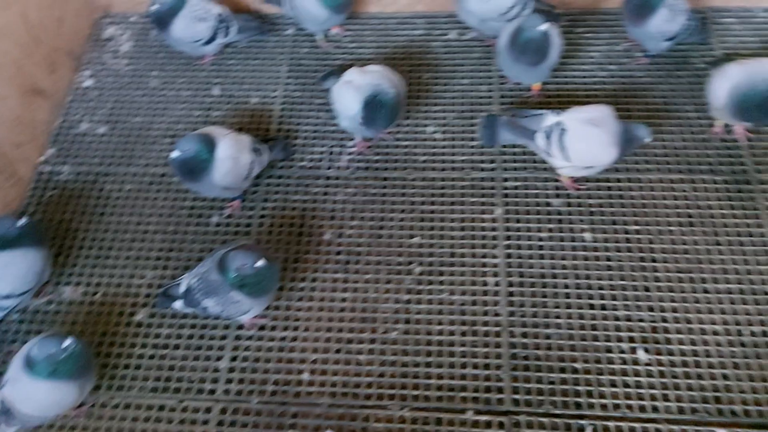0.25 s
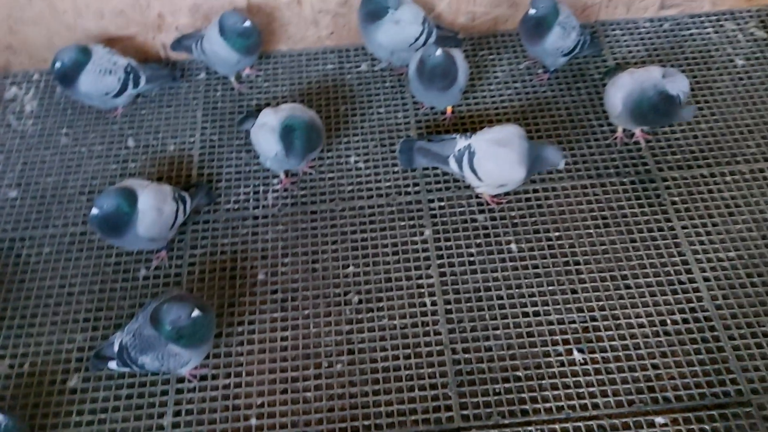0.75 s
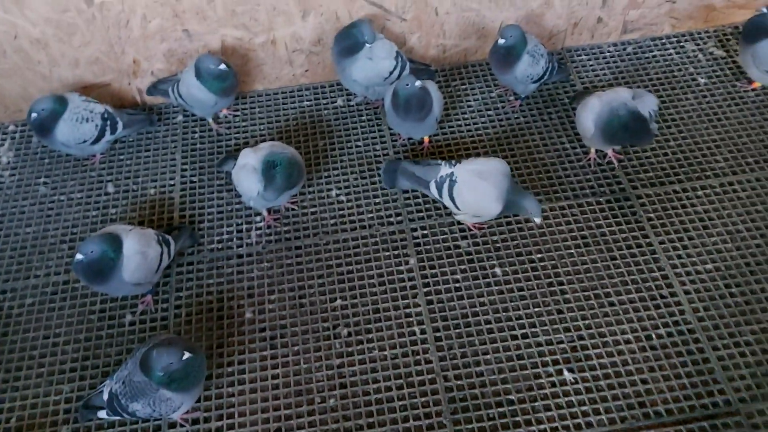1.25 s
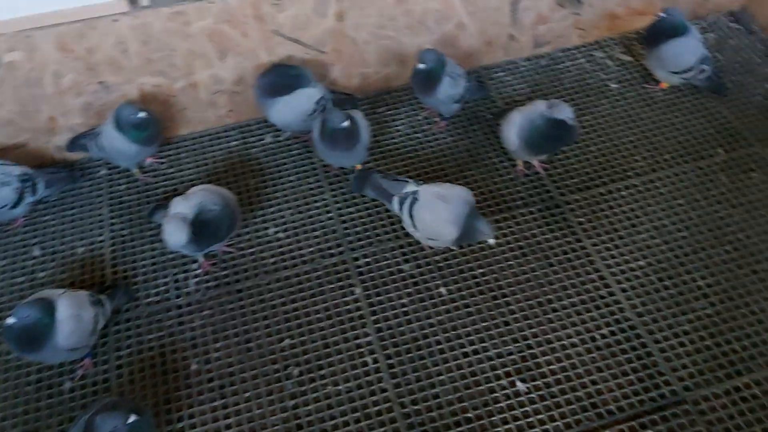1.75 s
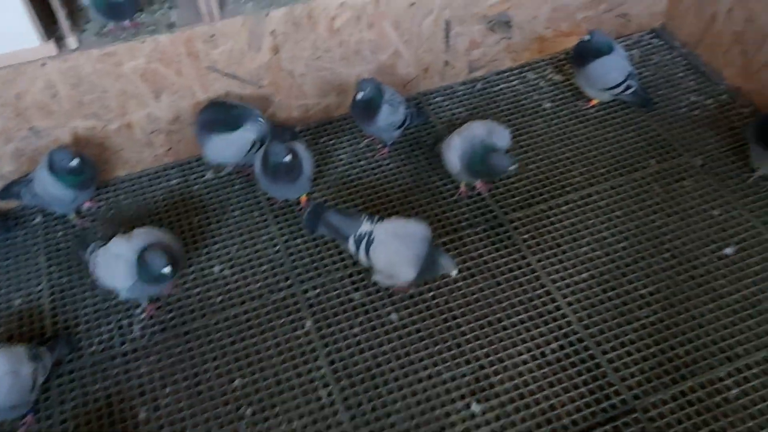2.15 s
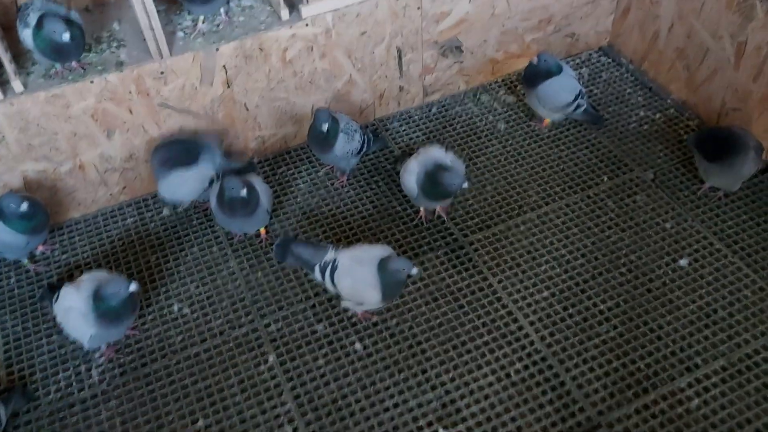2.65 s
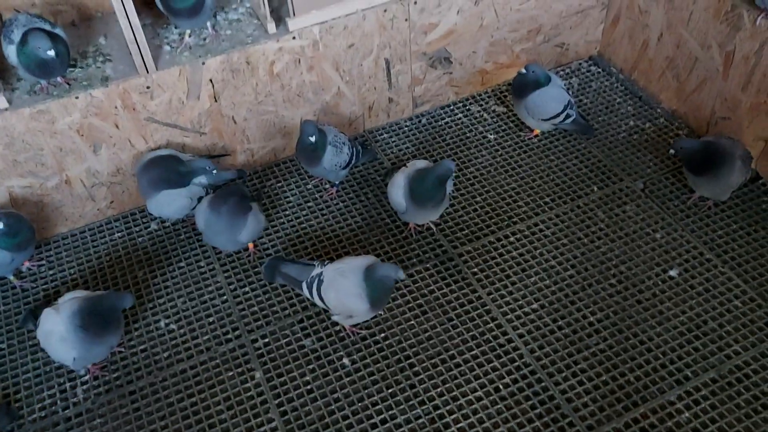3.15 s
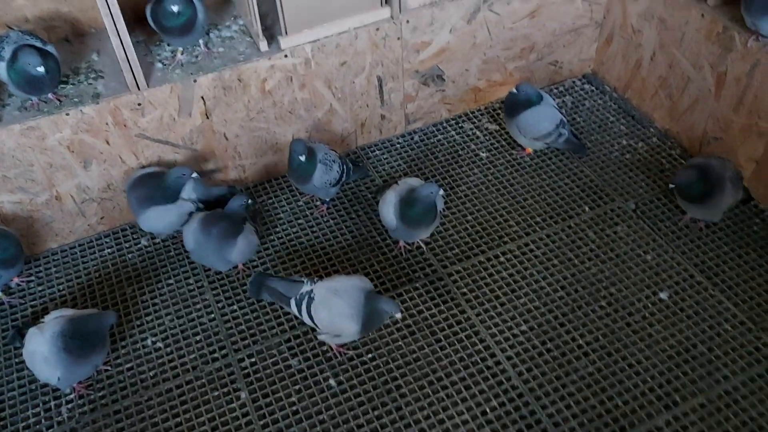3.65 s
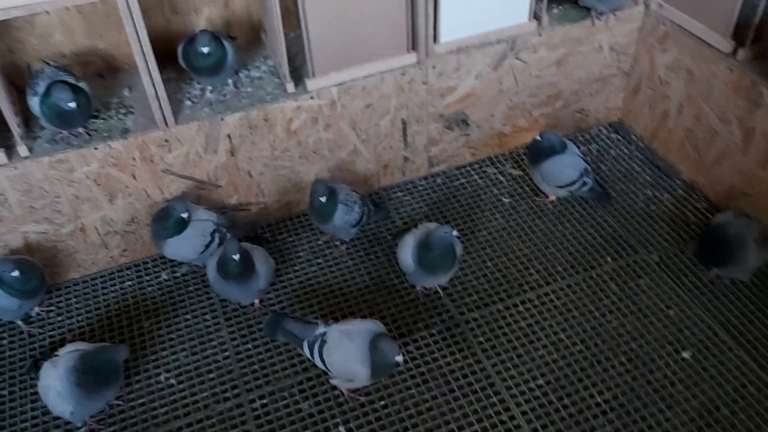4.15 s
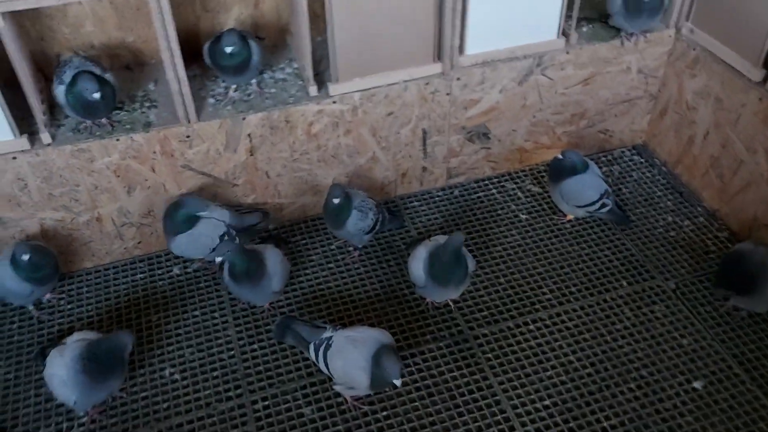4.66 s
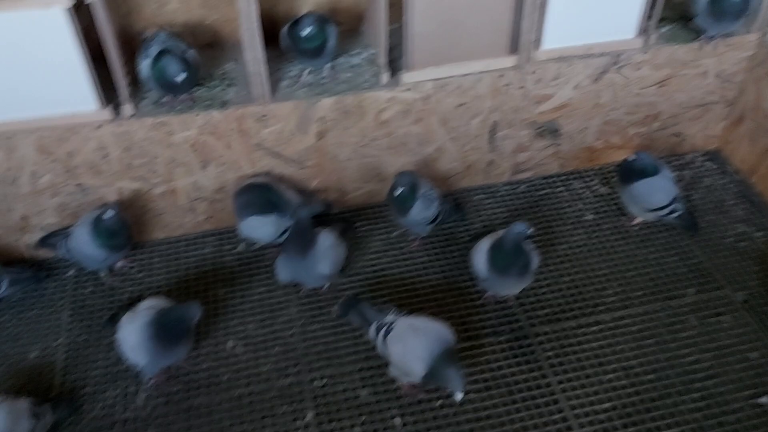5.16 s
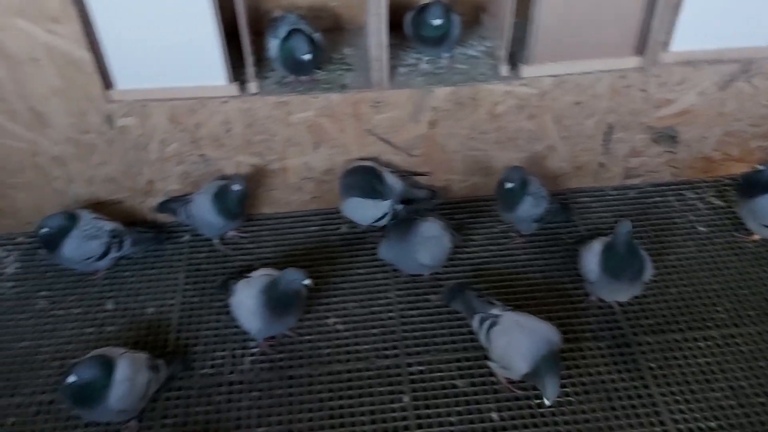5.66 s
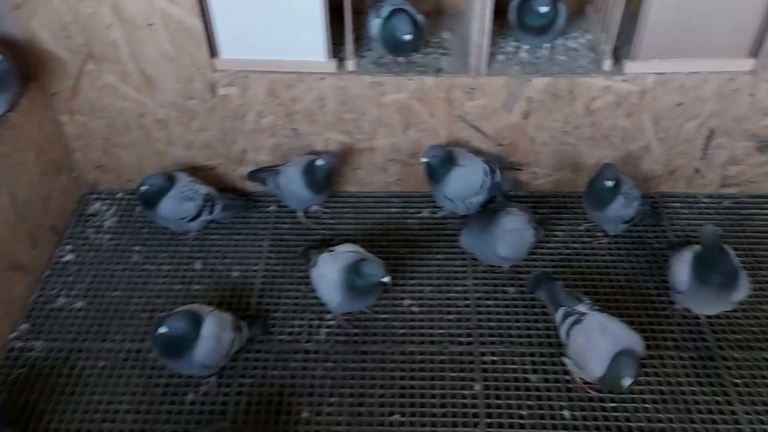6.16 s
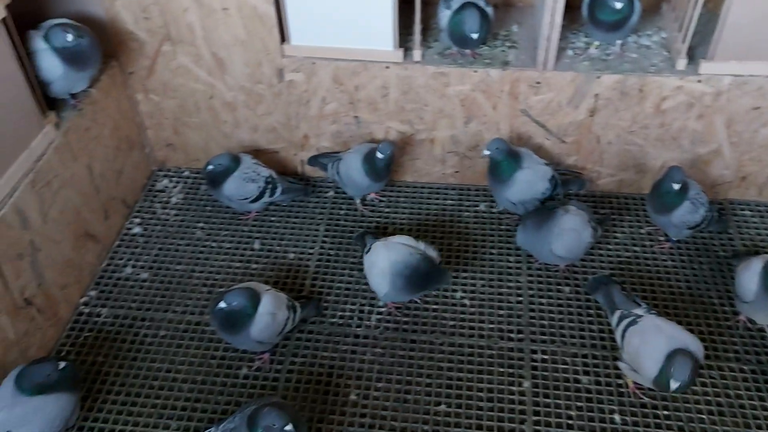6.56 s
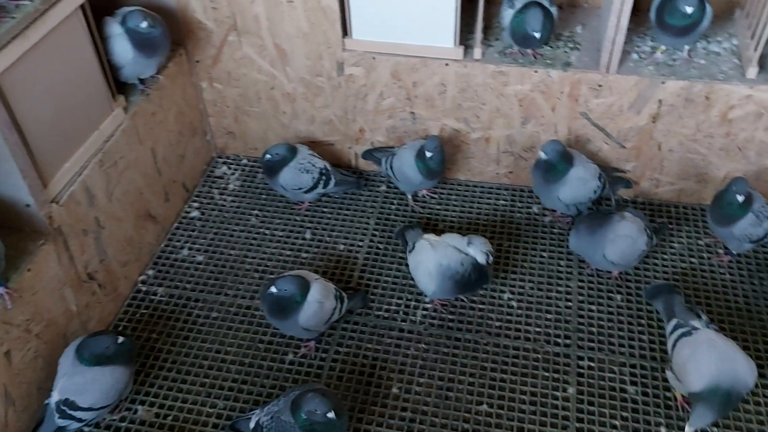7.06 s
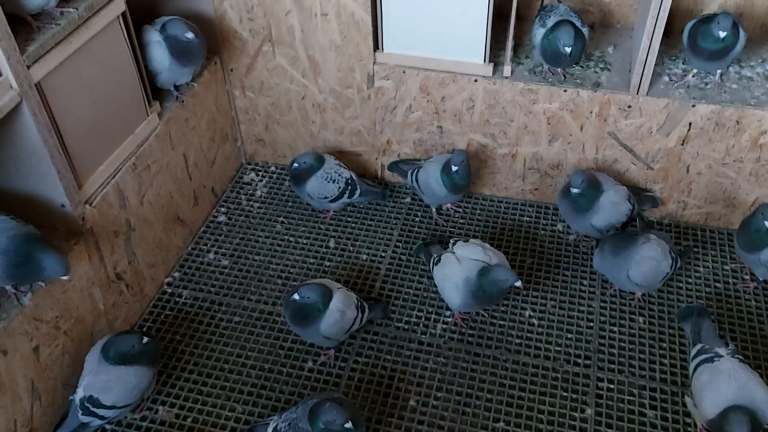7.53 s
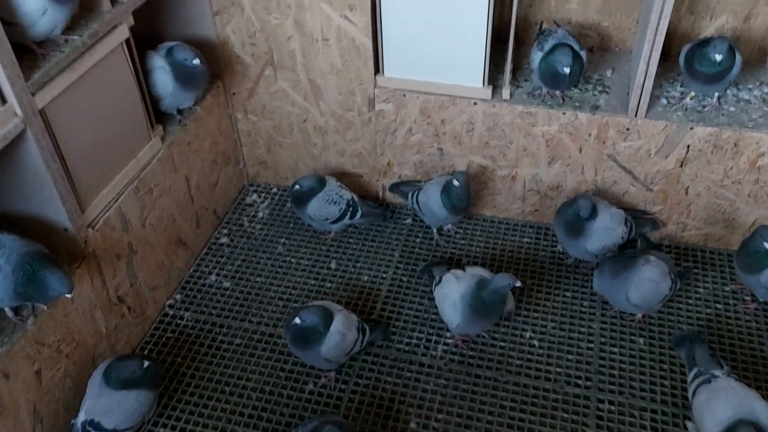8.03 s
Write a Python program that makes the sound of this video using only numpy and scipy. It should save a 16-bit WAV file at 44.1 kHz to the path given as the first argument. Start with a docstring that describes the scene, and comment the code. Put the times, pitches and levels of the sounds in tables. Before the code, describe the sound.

Many pigeons coo in a small wooden loft, close to a handheld stereo microphone. Low, nearly pure notes break into quick throaty trills or glide, some turning hoarse, over a murmur of birds farther back. Claws tick on the floor grating, feathers and a sleeve rustle faintly. The cooing thins after six seconds, wings flap dully at seven, then the voices return.

```python
"""In a small wooden loft, racing pigeons coo over one another close to a hand-held camera with two microphones.
Each near coo is a low, nearly pure note, chopped into a throaty trill or drawn out in a glide, and some turn
hoarse; wavering tones blend into the murmur of birds farther back, and reflections off the boards surround them.
Bursts of shaped noise make claws ticking on the grating, rustling feathers and sleeve, and beating wings,
over a low rumble, two unsteady hums and a faint wash of air."""
import sys
import numpy as np
from scipy import signal
from scipy.fft import rfft, irfft
from scipy.io import wavfile

SR = 44100
rng = np.random.default_rng(int(sys.argv[2]) if len(sys.argv) > 2 else 0)


def store_pcm(level_fs):
    """Save levels as 16-bit WAV."""
    pcm = np.round(np.clip(level_fs, -1, 1) * 32767).astype(np.int16)
    wavfile.write(sys.argv[1], SR, np.atleast_2d(pcm).T)


N = 365588
TIME = np.arange(N) / SR
# Levels in the tables are those before the gains and room balance applied further on.


def amp(db):
    """Decibels to gain."""
    return 10 ** (np.asarray(db) / 20)


def unit(x):
    """Scales to rms 1."""
    return x / np.sqrt(np.mean(x ** 2) + 1e-20)


def read(points, hz):
    """Reads a spectrum table on a log-frequency axis."""
    f, value = np.transpose(points)
    return np.interp(np.log(hz + 1), np.log(f + 1), value)


def level(curve):
    """A (time [s], level [dB]) curve as a gain for every sample."""
    return amp(np.interp(TIME, *np.transpose(curve)))


def swells(rows):
    """Rows of (middle [s], level [dB], time from middle to 1/e [s]) as smooth bumps of gain."""
    return sum(amp(db) * np.exp(-((TIME - s) / length) ** 2) for s, db, length in rows)


def colour(x, points):
    """Filters by a spectrum table, falling away steeply beyond its ends."""
    hz = np.fft.rfftfreq(x.shape[-1], 1 / SR) + 1
    low_skirt = 1 + (0.7 * points[0][0] / hz) ** 8
    high_skirt = 1 + (0.7 * hz / points[-1][0]) ** 8
    gain = amp(read(points, hz)) / np.sqrt(low_skirt * high_skirt)
    return irfft(rfft(x) * gain, x.shape[-1])


def wander(hz, size):
    """Smooth chance of rms 1, its spectrum a Gaussian fall of width hz."""
    spectrum = rfft(rng.standard_normal(size))
    fall = np.exp(-0.5 * (np.fft.rfftfreq(size, 1 / SR) / hz) ** 2)
    return unit(irfft(spectrum * fall, size))


def resonate(x, hz, width):
    """A two-pole resonance of peak gain 1."""
    return signal.lfilter(*signal.iirpeak(hz, hz / width, SR), x)


def add(mix, s, sound):
    """Mixes a sound in at a time."""
    part = mix[max(round(s * SR), 0):][:len(sound)]
    part += sound[:len(part)]


def beat(hz, length, arch, jitter, size=8192):
    """One puff through the syrinx, centred in its buffer: the pitch rises and falls with the pressure."""
    t = (np.arange(size) - size // 2) / SR
    swell = np.cos(np.pi / 2 * np.clip(t / length, -1, 1)) ** 2  # length is half of the puff
    pitch = hz * (1 + arch * (swell - 0.8) + jitter * wander(62, size=size))
    turns = np.cumsum(pitch) / SR
    lead = -t[0]  # from the start of the buffer to the middle of the puff
    return lead, swell, 2 * np.pi * (turns - turns[size // 2])


RASP_HZ, RASP_SPREAD = 446.7, 0.045  # throat resonance [Hz], its random shift between beats [share]
# The throat opens with effort: rise of the resonance [share per dB] over a beat of usual level [dB].
RASP_RISE, USUAL_DB = 0.0052, -36


def trill_beat(db, hz, length, rasp_db):
    """One beat of a near-pure note; an uneven flutter of the membranes adds a rasp that rings in the throat."""
    lead, swell, phase = beat(hz, length, arch=0.12, jitter=0.052)
    note = np.sin(phase) + amp(-39.0) * np.sin(2 * phase) + amp(-45) * np.sin(3 * phase)
    # Strong and weak cycles alternate: a faint growl an octave down.
    note = np.sqrt(2) * note + amp(-24.5) * np.sin(phase / 2)
    flutter = np.sin(phase) * wander(170, size=len(phase))
    shift = RASP_RISE * (db - USUAL_DB) + RASP_SPREAD * rng.standard_normal()
    rasp_hz = RASP_HZ * np.exp(shift)
    rasp = signal.hilbert(resonate(resonate(flutter, rasp_hz, 120), rasp_hz, 120))
    rasp_power = np.average(abs(rasp) ** 2, weights=swell) / 2
    rasp = rasp.real / np.sqrt(rasp_power)
    return lead, amp(db) * (swell * note + amp(rasp_db) * np.sqrt(swell) * rasp)


# Trills of birds close to the microphones: (first beat [s], last beat [s], number of beats,
# first level [dB], last level [dB], first pitch [Hz], last pitch [Hz], rasp over the note [dB])
TRILLS = [(0.515, 0.546, 2, -40.5, -44, 304, 313, -8.5), (0.616, 0.649, 2, -37.5, -45, 363, 333, -4),
          (0.686, 0.711, 2, -38, -41, 297, 325, -12), (0.819, 0.847, 2, -41, -37.5, 301, 290, -13),
          (1.064, 1.212, 4, -36.5, -31.5, 291, 298, -6.5), (1.702, 1.785, 3, -36, -37.5, 346, 296, -10.5),
          (2.062, 2.1, 2, -38.5, -34, 374, 301, -13), (2.138, 2.215, 3, -38, -27.5, 297, 315, -9.5),
          (2.339, 2.393, 2, -40.5, -47, 307, 290, -21), (2.435, 2.484, 2, -40, -41, 279, 282, -12.5),
          (2.55, 2.597, 2, -40.5, -39, 296, 299, -14.5), (2.798, 2.975, 3, -34, -35.5, 341, 289, -17),
          (3.067, 3.2, 3, -38.5, -40.5, 315, 269, -5), (3.257, 3.307, 2, -32, -32, 304, 353, -1.5),
          (3.344, 3.366, 2, -31, -26.5, 376, 329, -5.5), (3.51, 3.542, 2, -37, -39.5, 274, 298, -8),
          (3.945, 3.987, 2, -31.5, -38.5, 298, 316, -17), (4.126, 4.173, 3, -42.5, -37, 290.6, 271, -7.5),
          (4.241, 4.347, 3, -35, -57, 388, 296, -14.5), (4.369, 4.416, 2, -33.5, -29.5, 295, 322, -8),
          (4.459, 4.516, 3, -31.5, -32.5, 328, 285, -3), (4.632, 4.657, 2, -59, -38.5, 290, 275, -6),
          (4.828, 4.87, 2, -42, -43.5, 235, 273, -6.5), (5.143, 5.248, 3, -43.5, -40.5, 284, 267, -11.5),
          (5.284, 5.422, 3, -37.5, -48, 356, 262, -14.5), (5.65, 5.735, 3, -35.5, -28, 305, 297, -12),
          (5.79, 5.852, 2, -31, -41, 299, 282, -10), (5.924, 6.007, 3, -37, -35.5, 298, 275, -12),
          (6.051, 6.098, 2, -44.5, -41.5, 310, 240, -10), (6.92, 6.942, 2, -45, -47, 270, 283, -13),
          (7.302, 7.462, 5, -41, -41.5, 292, 318, -18), (7.68, 7.73, 2, -38.5, -32.5, 309, 247, -8.5),
          (7.779, 7.8, 2, -27.5, -27.5, 381, 341, -19.5), (7.848, 7.874, 2, -34, -35.5, 258, 258, -9),
          (8.02, 8.043, 2, -36, -59, 237, 225, -15.5)]
BEAT_S, BEAT_FILL = 0.025, 0.6  # longest half length of a beat [s], its largest share of the spacing
TRILL_SWELL_DB, BEAT_SCATTER_DB = -1.5, 0.5  # change of level at mid-trill, random spread between beats


def trills():
    """Runs of evenly spaced beats; strength and pitch slide from the first beat to the last."""
    out = np.zeros(N)
    for first, last, beats, first_db, last_db, first_hz, last_hz, rasp_db in TRILLS:
        along = np.linspace(0, 1, max(round(beats), 2))
        length = min(BEAT_S, BEAT_FILL * (last - first) * along[1])
        for u in along:
            db = first_db + (last_db - first_db) * u + TRILL_SWELL_DB * np.sin(np.pi * u)
            db += BEAT_SCATTER_DB * rng.standard_normal()
            hz = first_hz + (last_hz - first_hz) * u
            lead, sound = trill_beat(db, hz, length, rasp_db)
            add(out, first + (last - first) * u - lead, sound)
    return out


SCOOP, SCOOP_S = 0.1, 0.022  # a coo starts sharp by this share and settles with this time constant [s]
DROOP, DROOP_S = 0.08, 0.023  # it ends flat by this share, approached with this time constant [s]
COO_ATTACK_S, COO_RELEASE_S, COO_FADE_DB = 0.017, 0.018, -2.5  # swell in, stop, fade along its length
OCTAVE_ATTACK_S = 0.035  # the octave blooms later than the fundamental
# Pitch tremble [share] at the usual level; it doubles as the coo weakens by this much [dB].
TREMBLE, TREMBLE_DOUBLES_DB = 0.01, 7


def glide(length, early_hz, late_hz, low_db, octave_db, scoop):
    """A drawn-out note and its octave glide, droop as the air runs out, and tremble; scoop starts it sharp."""
    t = np.arange(0, length, 1 / SR)
    tremble = wander(33, size=32768)[:len(t)]
    shimmer = wander(51, size=32768)[:len(t)]
    bend = 1 + scoop * np.exp(-t / SCOOP_S) - DROOP * np.exp((t - length) / DROOP_S)
    hz = (early_hz + (late_hz - early_hz) * t / length) * bend
    weakness_db = USUAL_DB - max(low_db, octave_db)
    unsteady = min(TREMBLE * 2 ** (weakness_db / TREMBLE_DOUBLES_DB), 0.05)
    phase = 2 * np.pi * np.cumsum(hz * (1 + unsteady * tremble)) / SR
    edge = np.minimum(t / COO_ATTACK_S, (length - t) / COO_RELEASE_S)
    fade = np.sin(np.pi / 2 * np.clip(edge, 0, 1)) ** 2
    bloom = 1 - np.exp(-t / OCTAVE_ATTACK_S)
    note = amp(low_db) * np.sin(phase) + amp(octave_db) * bloom * np.sin(2 * phase)
    return np.sqrt(2) * note * fade * amp(COO_FADE_DB * t / length + 2.1 * shimmer)


# Drawn-out coos close by, before scoop and droop: (start [s], length [s], early pitch [Hz],
# late pitch [Hz], fundamental level [dB], octave level [dB])
COOS = [(1.32, .22, 183.3, 223.6, -47, -59), (1.9, 0.14, 301, 314.4, -41, -62),
        (2.238, 0.074, 305.6, 310.5, -25, -60), (2.375, .22, 204.7, 255.3, -45.5, -56),
        (2.85, 0.245, 175, 168.4, -51.5, -70), (3.535, 0.11, 240.7, 240.6, -39.5, -47),
        (3.675, 0.24, 359, 308.8, -26, -60), (4.22, 0.14, 222.4, 242, -47.5, -41),
        (4.655, 0.14, 240, 240.7, -44.5, -48), (5.13, 0.4, 168.2, 179.8, -51, -71),
        (5.35, 0.2, 271.7, 305.2, -38.5, -82), (5.485, 0.051, 236, 239, -44.5, -43),
        (5.62, 0.087, 218.7, 234.4, -56, -36.5), (5.91, 0.24, 211.5, 219.2, -46.5, -48),
        (6.17, .11, 243, 252, -83, -53), (7.33, .19, 205.5, 240.3, -52.5, -44.5),
        (7.475, 0.09, 268, 281, -36, -48), (7.57, 0.09, 288, 298, -33.5, -72),
        (8.01, 0.223, 212.3, 204.6, -46.5, -38.5), (8.225, 0.044, 349, 377, -39.5, -72)]


def coos(calls=COOS, scoop=SCOOP):
    """Lays drawn-out notes of the syrinx along the time line."""
    out = np.zeros(N)
    for s, *call in calls:
        add(out, s, glide(*call, scoop))
    return out


# Hoarse catches in the near voices: (middle [s], level [dB], pitch [Hz], half length [s])
CATCHES = [(1.153, -47, 683, 0.11), (1.467, -52.5, 622, 0.028), (2.197, -49.5, 708, 0.13),
           (2.548, -57, 673, 0.1), (3.372, -50, 703, 0.014), (3.681, -50.5, 692, 0.064),
           (3.953, -47.5, 626, 0.074), (4.96, -50, 578, 0.029), (5.354, -49, 642, 0.06),
           (5.392, -56.5, 745, 0.074), (7.531, -43, 642, 0.033), (7.555, -46, 700, 0.036)]


def catches():
    """Short, unsteady higher notes where a voice turns hoarse."""
    out = np.zeros(N)
    for s, db, hz, length in CATCHES:
        lead, swell, phase = beat(hz, length, arch=0.045, jitter=0.1)
        unsteady_db = db + 2.5 * wander(130, size=len(swell))
        add(out, s - lead, amp(unsteady_db) * swell * np.sin(phase))
    return out


# A thin chirp: (start [s], length [s], early pitch [Hz], late pitch [Hz],
# fundamental level [dB], octave level [dB])
CHIRP = [(0.305, .09, 1450, 1530, -63, -86)]


def chirp():
    """A thin, high glide that droops at its end but does not start sharp."""
    return coos(CHIRP, scoop=0)


# Murmur of the birds farther back: (time [s], level [dB])
FLOCK = [(0.0, -65.5), (0.27, -65), (0.5, -55.5), (1.15, -46.5), (1.55, -49.5), (1.78, -45), (1.88, -55.5),
         (2.02, -43.5), (2.3, -43), (2.62, -52.5), (2.85, -46), (3.22, -45.5), (3.45, -50), (3.8, -41.5),
         (4.06, -52.5), (4.4, -43), (4.85, -49.5), (5.0, -59.5), (5.1, -56.5), (5.22, -46.5), (5.95, -45),
         (6.22, -55), (6.4, -71), (6.8, -55), (7.16, -56), (7.35, -47.5), (7.74, -43), (7.95, -55),
         (8.29, -53.5)]
# Spectrum shaping of that murmur: (frequency [Hz], gain [dB])
FLOCK_COLOUR = [(76, -45.5), (130, -19.5), (214, -13.5), (268, -10), (291, -2.5), (357, -10.5), (454, -5),
                (621, -16), (1100, -28), (1430, -60.5), (2420, -120)]


def flock(count=6):
    """Farther birds, wavering, throbbing notes that come and go, blend with noise into a murmur."""
    out = np.zeros(N)
    for hz in np.geomspace(160, 380, count):
        waver = np.exp(0.1 * wander(3, size=N) + 0.035 * wander(59.9, size=N))
        phase = 2 * np.pi * np.cumsum(hz * waver) / SR
        throb_hz = 21 + 4 * wander(5.12, size=N)
        throb = 1 + 0.89 * np.sin(2 * np.pi * np.cumsum(throb_hz) / SR)
        note = np.sin(phase) + 0.44 * np.sin(2 * phase)
        out += amp(3.25 * wander(2.9, size=N)) * throb * note
    murmur = unit(out) + amp(2.5) * rng.standard_normal(N)
    return unit(colour(murmur, FLOCK_COLOUR)) * level(FLOCK)


# Resonances of the loft and its nest boxes: (frequency [Hz], width [Hz], gain [dB])
LOFT_MODES = [(306.7, 12, -6), (342.7, 3.6, -5), (403, 6.9, -5), (544, 2.6, -11.5)]


def boom(near):
    """Near voices set the resonances of the loft and nest boxes ringing."""
    return sum(amp(db) * resonate(near, hz, width) for hz, width, db in LOFT_MODES)


# Reverberation of the loft: (frequency [Hz], time to fall by 60 dB [s])
LOFT_DECAY = [(150, 0.3), (400, 0.35), (1500, 0.21), (4000, .2), (11000, 0.11)]


def loft(x, wet_db, left_db, size=22050):
    """Direct sound plus dense reflections off the boards, different at each side; left_db sets the balance."""
    sparse = rng.random((2, size)) < 0.1
    after_gap = np.arange(size) > 0.003 * SR
    taps = rng.standard_normal((2, size)) * sparse * after_gap
    hz, t, z = signal.stft(taps, SR, nperseg=256)
    decay = amp(-60 * t / read(LOFT_DECAY, hz)[:, None])
    tail = signal.istft(z * decay, SR, nperseg=256)[1]
    tail = tail / np.linalg.norm(tail, axis=1, keepdims=True)
    wet = signal.oaconvolve(x[None], tail, axes=1)[:, :N]
    sides = amp([[left_db / 2], [-left_db / 2]])
    return (x + amp(wet_db) * wet) / np.hypot(1, amp(wet_db)) * sides


# Where the cooing birds sit as the camera turns: (time [s], lag of the left microphone [ms])
BEARING = [(0, -0.089), (0.75, 0.21), (1.25, 0.2), (1.75, -0.29), (2.75, -0.17), (3.2, 0.28), (4.5, 0.22),
           (6.7, 0.24), (7.25, -0.23), (8.29, -0.15)]


def aim(pair):
    """Sound from one side reaches the two microphones a fraction of a millisecond apart."""
    lag = np.interp(TIME, *np.transpose(BEARING)) / 1000
    left = np.interp(TIME - lag / 2, TIME, pair[0])
    right = np.interp(TIME + lag / 2, TIME, pair[1])
    return np.array([left, right])


# Claws and beaks on the floor grating: (time [s], level [dB], brightness [dB per octave])
TICKS = [(0.848, -55.5, -4), (1.145, -55.5, -7), (1.682, -48.5, 0), (2.303, -43.5, 10), (2.797, -58, 2),
         (2.876, -56, 3), (4.931, -46.5, -2.5), (5.924, -59, 13), (6.006, -52, 11), (6.184, -41, 0),
         (7.022, -49, -3), (7.232, -56, 12), (7.441, -47.5, 1.5), (7.896, -56.5, 2.5), (8.158, -61.5, 0)]
# Spectrum shaping of a tick before its brightness tilt: (frequency [Hz], gain [dB])
TICK_COLOUR = [(800, -26), (2000, -13), (4300, -3), (6000, -4.5), (7800, 3.5), (9500, -10.5), (13000, -3),
               (16000, -25.5)]
SCUFF_S, TICK_T60_S = 0.0018, 0.026  # how long a claw slides, how long the slat takes to fall by 60 dB


def ticks(size=4096):
    """A claw catches a slat, scuffs over it grain by grain, and the crack dies away."""
    out = np.zeros(N)
    t = np.arange(size) / SR
    onset = 1 - np.exp(-t / (0.067 * SCUFF_S))
    decay = amp(-60 * np.maximum(t - SCUFF_S, 0) / TICK_T60_S)
    for s, db, brightness in TICKS:
        points = [(hz, gain_db + brightness * np.log2(hz / 7500)) for hz, gain_db in TICK_COLOUR]
        grains = rng.standard_normal(size) * amp(1.4 * wander(640, size=size))
        crack = unit(colour(grains, points))
        add(out, s, amp(db) * crack * onset * decay)
    return out


# Wing beats and soft bumps: (time [s], push level [dB], push pitch [Hz], swish level [dB])
FLAPS = [(7.02, -33, 65.3, -78), (7.044, -31, 85.5, -43.5), (7.06, -53, 110, -40.5), (7.081, -47, 91, -39),
         (7.102, -36, 68.6, -45), (7.129, -34, 60, -69), (7.284, -38.5, 85, -47.5), (7.484, -39, 70, -53.5)]
# Spectrum shaping of the swish: (frequency [Hz], gain [dB])
SWISH_COLOUR = [(100, -7), (180, 0.5), (350, 9.5), (480, 0), (800, -12.5), (1200, -53.5), (5000, -46.5)]


def flaps(size=8192):
    """Each wing beat is a low push of air and a short swish."""
    out = np.zeros(N)
    t = np.arange(size) / SR
    u, v = t / 0.0045, t / 0.0091  # times over the moments at which push and swish peak [s]
    for s, db, hz, swish_db in FLAPS:
        push = u * np.exp(1 - u) * np.sin(2 * np.pi * hz * t)
        swish = unit(colour(rng.standard_normal(size), SWISH_COLOUR)) * v * np.exp(1 - v)
        add(out, s, amp(db) * push + amp(swish_db) * swish)
    return out


# Soft stirs of air from shifting wings: (middle [s], level [dB], time from middle to 1/e [s])
STIRS = [(0.024, -62.5, 0.05), (0.314, -64, 0.17), (0.6, -55.5, 0.065), (0.9, -55, 0.067),
         (6.7, -66, 0.017), (6.777, -55, 0.046)]
# Spectrum shaping of the stirs: (frequency [Hz], gain [dB])
STIR_COLOUR = [(130, -3), (300, 7), (520, 13.5), (800, -1.5), (1100, -12), (1600, -69)]


def stirs():
    """Slow wings push soft, dull puffs of air."""
    return unit(colour(rng.standard_normal(N), STIR_COLOUR)) * swells(STIRS)


def rustle(gain, points, grains_per_s, grain_db, flicker_db, left_db):
    """Rubbing fibres: a diffuse hiss with tiny snaps of uneven size, each scattered briefly by the boards."""
    sizes = amp(3.0 * np.minimum(rng.exponential(1, N), 3))
    snaps = (rng.random(N) < grains_per_s / SR) * sizes
    hold = np.exp(-1 / (0.0017 * SR))  # snap energy decays with a time constant of 1.7 ms
    scatter = unit(np.sqrt(signal.lfilter([1], [1, -hold], snaps ** 2)))
    friction = rng.standard_normal((2, N)) * np.hypot(1, amp(grain_db) * scatter)
    flicker = amp(flicker_db * wander(14, size=N))
    sides = amp([[left_db / 2], [-left_db / 2]])
    return unit(colour(friction, points)) * flicker * gain * sides


# Feathers and feet shuffling: (time [s], level [dB])
FEATHERS = [(0.0, -75), (0.81, -70.5), (1.22, -67.5), (1.38, -64.5), (1.78, -69.5), (2.1, -63.5),
            (2.58, -72), (3.58, -71.5), (4.11, -76), (4.66, -72.5), (4.96, -75.5), (6.09, -71),
            (6.51, -77.5), (6.95, -71), (7.94, -78.5), (8.29, -80)]
# Single strokes of feather on feather: (middle [s], level [dB], time from middle to 1/e [s])
STROKES = [(0.143, -71, 0.033), (1.25, -69, 0.056), (1.538, -65.5, 0.019), (2.98, -69, 0.048),
           (3.35, -66.5, 0.042), (3.612, -66.5, 0.057), (3.845, -71, .03), (4.862, -69.5, 0.029),
           (5.39, -68.5, 0.064), (5.485, -68.5, 0.043), (6.658, -74.5, 0.05), (6.8, -68.5, 0.078),
           (7.09, -69, 0.055), (7.29, -71.5, 0.064)]
# Spectrum shaping of the feathers: (frequency [Hz], gain [dB])
FEATHER_COLOUR = [(1760, -48), (3000, -20), (3570, -36.5), (4190, -1.5), (4850, -5.5), (6720, -3),
                  (8110, 4.5), (8570, 1.5), (9380, -11.5), (11200, -3), (12700, -2.5), (15800, -9.5)]


def feathers():
    """Feathers rub with a steady fidgeting and single strokes on top: a bright, grainy hiss."""
    effort = np.hypot(amp(1.5) * level(FEATHERS), amp(4.5) * swells(STROKES))
    return rustle(effort, FEATHER_COLOUR, grains_per_s=25, grain_db=-9.5, flicker_db=2.56, left_db=-5.0)


# A sleeve brushing as the camera turns: (time [s], level [dB])
SLEEVE = [(0.0, -72.5), (0.45, -72), (0.72, -81), (1.02, -64), (1.2, -67.5), (1.48, -60), (1.85, -63.5),
          (2.1, -60.5), (2.56, -64), (3.0, -73.5), (3.6, -69), (4.1, -78), (4.45, -66), (4.9, -70),
          (5.15, -77.5), (6.1, -73), (6.45, -84), (7.05, -75), (7.95, -82), (8.29, -74)]
# Spectrum shaping of the cloth: (frequency [Hz], gain [dB])
SLEEVE_COLOUR = [(530, -28.5), (900, 2.5), (1130, -1.5), (1550, 5), (2140, 2), (3040, -4.5), (4110, -1.5),
                 (5550, -9.5), (7000, -10.5), (9100, -35), (15400, -120)]


def sleeve():
    """Cloth rubs in a grainy hiss, together with the duller, cloth-like part of each feather stroke."""
    effort = np.hypot(level(SLEEVE), amp(-1) * swells(STROKES))
    return rustle(effort, SLEEVE_COLOUR, grains_per_s=250, grain_db=-15.5, flicker_db=1.5, left_db=-3.0)


# Low rumble in the loft: (time [s], level [dB])
RUMBLE = [(0.0, -67), (0.55, -73), (1.2, -68.5), (2.4, -67.5), (3.8, -64), (4.3, -70.5), (5.4, -67),
          (6.15, -68.5), (6.5, -76), (6.85, -67), (7.7, -70), (8.29, -74)]
# Spectrum shaping of the rumble: (frequency [Hz], gain [dB])
RUMBLE_COLOUR = [(30, -10), (40, -9.5), (54, -8), (72, -4.5), (100, -0.5), (130, -2), (180, -7.5),
                 (260, -13.5), (400, -31.5)]


def rumble():
    """A low, uneven rumble of filtered noise, mostly shared by both sides."""
    shared, left, right = (unit(colour(rng.standard_normal(N), RUMBLE_COLOUR)) for _ in range(3))
    return np.array([shared + 0.41 * left, 1.52 * shared + 0.15 * right]) * level(RUMBLE)


# Two low hums that swell and waver: (time [s], level of the lower [dB], level of the upper [dB])
HUMS = [(0.0, -57.5, -61.5), (0.9, -59, -53), (1.3, -67, -67), (2.1, -68, -57), (3.1, -68, -67.5),
        (4.1, -66, -64.5), (4.4, -55, -63), (5.1, -61, -61.5), (5.95, -62, -66), (6.4, -73, -88),
        (7.2, -57.5, -58.5), (8.29, -67, -70.5)]
# Pitches about which the lower and the upper hum waver: [Hz]
HUM_HZ = [42.1, 73.6]


def hums():
    """Low tones whose pitch and strength never settle, slightly louder on the left."""
    s, *levels = np.transpose(HUMS)
    out = np.zeros(N)
    for hz, db in zip(HUM_HZ, levels):
        phase = 2 * np.pi * np.cumsum(hz + 3.5 * wander(7.2, size=N)) / SR
        unsteady_db = np.interp(TIME, s, db) + 2.7 * wander(5.5, size=N)
        out += np.sqrt(2) * np.sin(phase) * amp(unsteady_db)
    return out * amp([[1], [-1]])


# Still air in the loft: (frequency [Hz], gain [dB])
AIR_COLOUR = [(150, 1), (400, -2), (700, -2.5), (1100, -6.5), (1700, -17.5), (3000, -35), (4200, -43.5),
              (6000, -27.5), (8200, -30.5), (9500, -19), (15500, -22.5)]


def air():
    """A faint steady wash from all sides: separate filtered noise at each microphone."""
    return amp(-67.5) * unit(colour(rng.standard_normal((2, N)), AIR_COLOUR))


def scene():
    """Near voices set the loft's resonances ringing; the far birds carry more reflections."""
    near = amp(0.43) * trills() + amp(-0.5) * coos() + catches()
    near_birds = loft(near + boom(near), wet_db=-15, left_db=-2.0)
    far_birds = amp(1.0) * loft(flock(), wet_db=-8.5, left_db=-0.5)
    voices = aim(near_birds + far_birds)
    thin_chirp = amp(-8.0) * loft(chirp(), wet_db=-9, left_db=1)
    claws = amp(-1.5) * loft(ticks(), wet_db=1.5, left_db=-6.0)
    wings = amp(-0.5) * loft(flaps(), wet_db=-10.5, left_db=10.5) + loft(stirs(), wet_db=-3, left_db=-0.5)
    background = amp(8.0) * rumble() + amp(-0.5) * hums() + air()
    return voices + thin_chirp + claws + wings + feathers() + sleeve() + background


def record(dry):
    """The microphones lose the deepest bass; then the recorder's band limit."""
    bass_cut = signal.butter(6, 31, "highpass", fs=SR, output="sos")
    heard = signal.sosfilt(bass_cut, dry)
    band_limit = signal.firwin(801, 15850, window=("kaiser", 9), fs=SR)  # edge in Hz
    return signal.oaconvolve(heard, band_limit[None], "same")


dry = scene()
out = record(dry)
store_pcm(out)
```